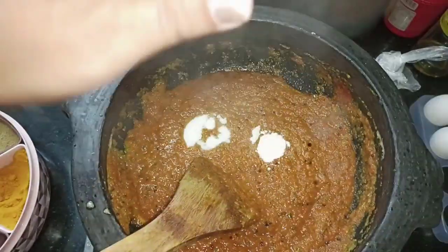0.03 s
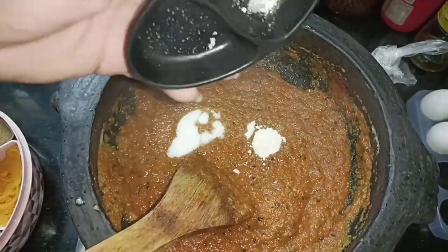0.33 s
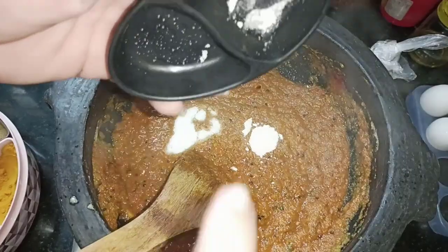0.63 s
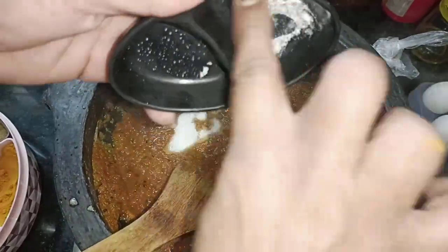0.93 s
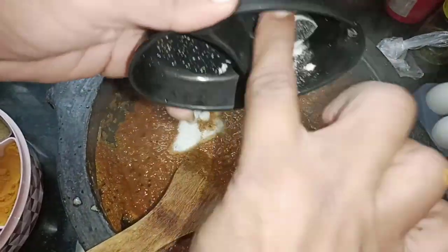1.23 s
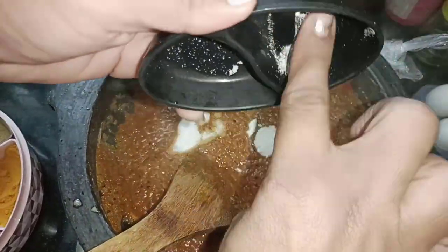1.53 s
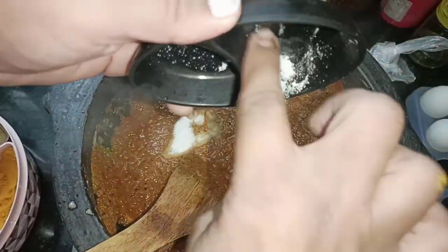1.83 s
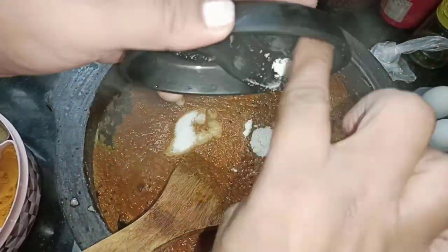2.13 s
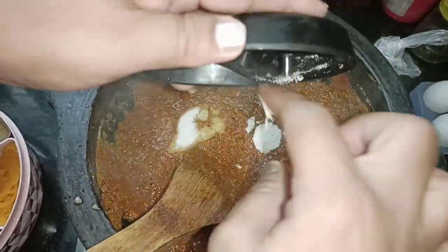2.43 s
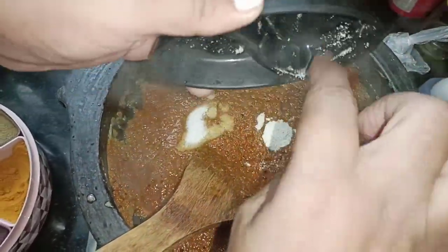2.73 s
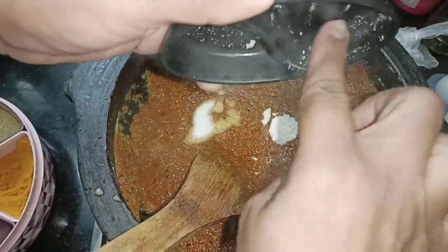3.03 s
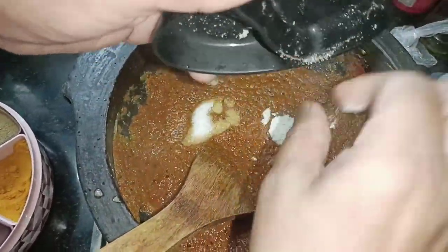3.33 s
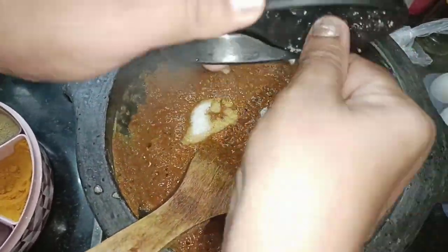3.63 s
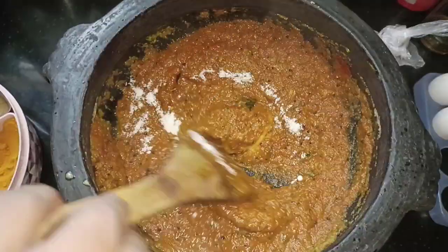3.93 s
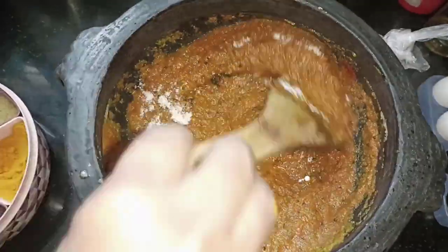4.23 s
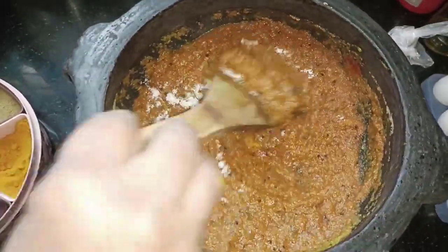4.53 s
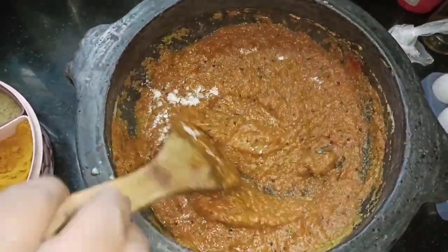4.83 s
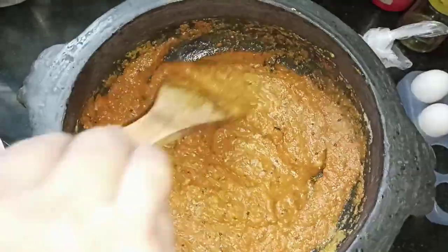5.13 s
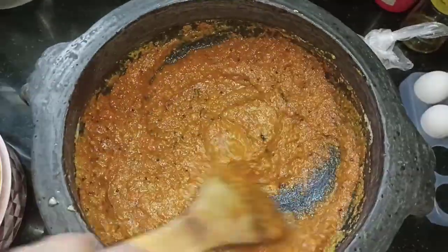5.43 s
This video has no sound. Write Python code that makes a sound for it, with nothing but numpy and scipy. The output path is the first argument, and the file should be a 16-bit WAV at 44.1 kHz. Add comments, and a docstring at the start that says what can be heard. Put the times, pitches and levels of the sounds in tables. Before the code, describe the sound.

Close to a clay pot in a small, quiet kitchen, thick masala simmers with little spits of steam and round bubble pops. A plastic dish clicks dryly above it a few times. Past halfway, a wooden spoon starts stirring in quick strokes, scraping and knocking dully on the clay while the wet paste squelches and sizzles louder. The sound drops out briefly near the end, then the stirring resumes.

```python
"""A small kitchen, close to a clay pot of thick masala frying. Steam jets hiss and whistle through
the paste, bursting bubbles ring as cavity resonators, and a plastic dish clicks above them.
Then a wooden spoon stirs in short strokes: stick-slip friction excites the modes of the clay,
each shove rocks the pot, and wet paste laid on the hot bottom flares into fresh sizzle.
Between two rounds of stirring the sound drops out briefly."""
import sys
import numpy as np
from scipy import signal
from scipy.fft import rfft, irfft, next_fast_len
from scipy.io import wavfile
from scipy.ndimage import uniform_filter1d, map_coordinates

SR = 44100
rng = np.random.default_rng(int(sys.argv[2]) if len(sys.argv) > 2 else 0)


def put_to_file(sound):
    """Save the sound as 16-bit audio at rate SR, in the file named by the first command-line argument."""
    columns = np.atleast_2d(sound).T  # one column per channel
    safe = np.clip(columns, -1, 1)
    whole_steps = np.round(safe * 32767)
    wavfile.write(sys.argv[1], SR, whole_steps.astype(np.int16))


N = 245637
TIME = np.arange(N) / SR


def amp(db):
    """Amplitude ratio of a level in decibels."""
    return 10 ** (np.asarray(db) / 20)


def unit(x):
    """Normalisation to rms 1."""
    return x / np.sqrt(np.mean(x ** 2) + 1e-20)


def along(points, hz):
    """Interpolation of (f/Hz, value) points on a logarithmic frequency axis."""
    f, v = np.transpose(points)
    return np.interp(np.log(hz + 1), np.log(f + 1), v)


def filtered(x, response):
    """Linear filtering: the spectrum times a complex frequency response."""
    n = x.shape[-1]
    m = next_fast_len(n + SR // 4)
    return irfft(rfft(x, m) * response(np.fft.rfftfreq(m, 1 / SR)), m)[..., :n]


def coloured(x, spectrum):
    """Minimum-phase filter through (f/Hz, gain/dB) points."""
    def response(hz):
        cepstrum = irfft(np.log(amp(along(spectrum, hz))))
        half = len(cepstrum) // 2
        return np.exp(rfft(np.r_[cepstrum[0], 2 * cepstrum[1:half], np.zeros(half)]))
    return filtered(x, response)


def resonance(f, hz, width):
    """Frequency response of a damped oscillator, unity at its centre."""
    return 1j * f * width / (hz * hz - f * f + 1j * f * width)


def cavity(x, hz, q):
    """Two equal resonators in cascade: one peak with steep skirts."""
    return filtered(x, lambda f: resonance(f, hz, hz / q) ** 2)


def ringing(x, modes):
    """Modal superposition: x drives resonators in parallel."""
    return filtered(x, lambda f: sum(amp(db) * resonance(f, hz, width) for hz, width, db in modes))


def wobble(rate):
    """Smooth random modulation, with rate knots a second."""
    return map_coordinates(rng.standard_normal(int(N * rate / SR) + 4), [TIME * rate])


def swell(s, rise, hold, fall, sag_db_per_s=31.5):
    """Exponential envelope: peak at s, sagging hold, release; rise and fall are the times for 20 dB."""
    t = TIME - s
    attack_db = np.minimum(20 * t / rise, 0)
    release_db = 20 * np.maximum(t - hold, 0) / fall
    return amp(attack_db - sag_db_per_s * np.clip(t, 0, hold) - release_db)


# Likeness of left and right: f/Hz, correlation coefficient
COHERENCE = [(100, 0.9), (600, 0.9), (1400, 0.04), (2500, 0.29)]
def pair(n):
    """Partially coherent stereo white noise: alike in the bass, nearly independent in the treble."""
    def weights(hz):
        angle = np.arccos(along(COHERENCE, hz)) / 2
        return np.array([np.cos(angle), np.sin(angle)])
    mid, side = filtered(rng.standard_normal((2, n)), weights)
    return np.array([mid + side, mid - side])


def crackle(rate, life_s, spread_db, share):
    """Shot noise: a share of the power arrives in random decaying bursts, rate a second."""
    onsets = rng.random(N) < rate / SR
    sizes = onsets * amp(spread_db * np.clip(rng.standard_normal(N), -2, 2)) ** 2
    power = signal.lfilter([1], [1, -np.exp(-2 / (life_s * SR))], sizes)
    return pair(N) * np.sqrt(1 - share + share * power / power.mean())


# Spectrum of the room air: f/Hz, level/dB
AIR_SPECTRUM = [(20, -37.5), (70, -4), (120, -14.5), (220, 1), (700, -10), (1500, -8.5), (2300, 6),
                (3200, -13.5), (4500, -24.5), (6700, -13.5), (8500, -7), (10000, -45.5), (16000, -23)]
# Soft low rumbles: t/s, hold/s, level/dB
RUMBLES = [(0.27, 0.033, -71), (0.6, 0.053, -71), (0.877, 0.13, -71), (2.73, 0.1, -77), (2.903, 0.22, -67),
           (3.25, 0.18, -71)]
def kitchen(air_db=-67, rumble_floor_db=-94):
    """Ambient noise: steady room air over a low rumble that comes and goes."""
    swells = sum(amp(db) * swell(s, rise=0.17, hold=hold, fall=hold) for s, hold, db in RUMBLES)
    spectrum = [(20, -19), (50, -10), (70, -2.5), (95, 6.5), (160, -16), (400, -104)]
    rumble = (amp(rumble_floor_db) + swells) * unit(coloured(pair(N), spectrum))
    return amp(air_db) * unit(coloured(pair(N), AIR_SPECTRUM)) + rumble


# Reverberation time of the kitchen: f/Hz, T60/s
REVERB_TIMES = [(150, 0.2), (1000, 0.19), (5000, 0.16), (15000, 0.27)]
def walls(x, delay_s=0.0014):
    """Reverberation: a diffuse tail decays exponentially, at its own rate for each frequency."""
    hz, t, z = signal.stft(pair(SR // 2), SR, nperseg=256)
    tail = signal.istft(z * amp(-60 * t / along(REVERB_TIMES, hz)[:, None]), SR, nperseg=256)[1]
    tail *= np.clip(np.arange(tail.shape[1]) / SR / delay_s - 1, 0, 1)
    echo = signal.fftconvolve(x, tail / np.linalg.norm(tail[0]), axes=1)[:, :N]
    return coloured(echo, [(200, -13.5), (600, -6.5), (1300, -2.5), (6000, -9), (14000, -7)])


# Soft pushes on the pot: t/s, level/dB, f/Hz, rise/s
BUMPS = [(0.268, -49, 110, 0.013), (.608, -58, 114.5, 0.023), (2.607, -61, 117, 0.018),
         (3.745, -56, 62, 0.012), (4.019, -48, 118, 0.021), (4.131, -43, 121, 0.021),
         (4.372, -56, 58, 0.0073), (4.513, -48, 111, 0.018), (4.56, -57, 55, 0.014),
         (4.606, -37.5, 118.5, 0.017), (4.729, -55, 113, 0.011), (4.929, -54, 60, .009),
         (5.281, -47.5, 115, 0.021), (5.425, -59, 68, .016)]
def bumps(jitter_rad=0.17, rumble_db=-5):
    """Damped oscillation: a push sets the pot rocking unevenly, with a loose rumble from its stand."""
    out, t = np.zeros((2, N)), np.arange(SR // 3) / SR
    for s, db, hz, rise in BUMPS:
        rock = np.sin(2 * np.pi * hz * t + jitter_rad * wobble(70)[:len(t)])
        rumble = amp(rumble_db) * unit(cavity(pair(len(t)), hz, q=0.75))
        add(out, s, amp(db) * t / rise * np.exp(1 - t / rise) * (rock + rumble))
    return out


def add(track, s, sound):
    """Superposition of a sound on the track, from s seconds."""
    part = track[..., max(round(s * SR), 0):][..., :sound.shape[-1]]
    part += sound[..., :part.shape[-1]]


# Peaks and dips of the hollow above the paste: f/Hz, bandwidth/Hz, gain/dB
BOWL_MODES = [(1744, 94, 12), (2130, 60, 2.5), (2640, 660, 4.5), (3410, 130, -12), (5000, 450, 7.5),
              (6540, 44, -0.5), (6850, 260, 4)]
def bowl(x):
    """Cavity resonance: the air in the pot colours the sizzle."""
    return filtered(x, lambda f: 1 + sum((amp(db) - 1) * resonance(f, hz, width)
                                         for hz, width, db in BOWL_MODES))


def folds(x, depth_db):
    """Spectral modulation: band gains drift at random, as when folds of paste open and close."""
    z = signal.stft(x, nperseg=512)[2]
    field = uniform_filter1d(rng.standard_normal(z.shape[1:]), size=3, axis=0)
    field = uniform_filter1d(field, size=8, axis=1)
    return signal.istft(z * amp(depth_db * unit(field)), nperseg=512)[1][:, :N]


# Spectrum of hissing steam and oil: f/Hz, level/dB
HISS_SPECTRUM = [(1100, -63), (1550, -45.5), (1850, -4), (2100, -4), (2450, -3), (3100, -8), (3700, -7),
                 (4500, -19.5), (5400, -12), (6700, -5), (7700, -13), (8800, -21), (11000, -50)]
def simmer(level_db=-70.5):
    """Shot noise of tiny bubbles ticking in the oil throughout."""
    ticks = bowl(crackle(rate=45, life_s=0.005, spread_db=3, share=0.75))
    return amp(level_db) * unit(coloured(ticks, HISS_SPECTRUM))


def faint_spits(count=12, until_s=3.5, width_s=0.0064, hz=2000, whistle_db=-6, spray_db=-12):
    """A random point process: weak spits, as rows like those of SPITS."""
    return [(until_s * when, width_s, -53 - 6 * weakness, hz * 2 ** (pitch - 0.5), whistle_db, spray_db)
            for when, weakness, pitch in rng.random((count, 3))]


# Spectra of a crater's throat and of fine spray: f/Hz, level/dB
THROAT_SPECTRUM = [(200, -19.5), (420, -16.5), (570, -3), (720, -10.5), (860, -4), (1000, -27), (1220, 9),
                   (1400, -10), (1600, -22.5), (2200, -75.5)]
FIZZ_SPECTRUM = [(7000, -14.5), (8500, -48), (9800, -1), (11200, -3), (12200, 9.5), (14000, 6),
                 (16000, 3.5)]
# Strong spits of steam: t/s, half-length/s, level/dB, whistle f/Hz, whistle and spray/dB re level
SPITS = [(0.071, 0.032, -56, 3000, -0.5, -15.5), (0.094, 0.0031, -53, 5680, 9.5, 4),
         (0.142, 0.0054, -56.5, 2200, 8, -18), (0.156, 0.0043, -41.5, 1250, -11, -20.5),
         (0.243, 0.0088, -51, 1880, -4, -11.5), (.284, 0.01, -53, 596, -16, -35),
         (0.419, 0.005, -45, 6870, -3, -3.5), (0.445, 0.0054, -54.5, 2830, 8.5, -12),
         (0.604, 0.0054, -39, 2405, 2, -24.5), (0.716, 0.02, -53.5, 5330, -9, -5),
         (0.865, 0.0071, -54, 1780, 5.5, -10), (0.893, 0.0024, -52.5, 5900, 6.5, -3.5),
         (0.966, 0.0073, -49.5, 1190, -13, -13.5), (1.003, 0.013, -52, 1260, -8, -4),
         (1.154, 0.013, -50.5, 2510, 1, -10), (1.242, 0.0052, -41, 5950, -1.5, 3),
         (1.343, 0.014, -49.5, 1850, -6, -5.5), (1.508, 0.047, -59, 5250, -10, -7.5),
         (1.649, 0.023, -46, 2570, -13, -13.5), (1.706, 0.003, -37, 1770, -6, -15.5),
         (1.746, 0.0089, -41.5, 6040, -4.5, -1), (1.886, 0.0024, -43, 6550, 1, -19.5),
         (1.975, 0.022, -60.5, 6660, 7.5, 5.5), (2.029, 0.0052, -44, 5440, -7, -16),
         (2.134, 0.0063, -43, 3680, -2.5, -22.5), (2.19, 0.019, -49.5, 2050, -4, -10),
         (2.26, 0.0059, -44, 2900, -4, -17), (2.349, 0.0051, -46, 2600, 7.5, 4.5),
         (2.365, 0.0045, -42.5, 5300, -18, 1.5), (2.597, 0.0053, -39.5, 2620, -10.5, -18.5),
         (2.792, 0.011, -50.5, 2660, -8.5, -9.5), (2.86, .011, -47.5, 2670, -10, -8),
         (3.024, 0.0094, -47.5, 2270, -4, -16.5), (3.067, 0.012, -44, 2640, -0.5, -4.5),
         (3.175, 0.0041, -46.5, 2050, 0, -15), (3.194, 0.0033, -49.5, 2170, 7, -16),
         (3.209, 0.0089, -51, 2250, -5, -5), (3.252, 0.011, -42, 2490, -4.5, -12.5),
         (3.393, 0.0067, -41, 2580, 5.5, -1.5), (3.475, 0.0096, -51, 1900, 4, -30)]
def spits(whistle_q=10, crater_hz=1330):
    """Jet noise: steam escapes a crater in the paste, rings its throat, whistles and throws off spray."""
    powers, whistles = np.zeros((3, N)), np.zeros((2, N))
    for s, width, db, hz, whistle_db, spray_db in SPITS + faint_spits():
        skew = np.where(TIME < s, 0.8, 1.15)  # opens faster than it closes
        opening = np.exp(-0.25 * ((TIME - s) / (width * skew)) ** 2)
        throat_db = -4.5 - 3 * np.log2(hz / crater_hz)  # narrower craters: higher, with less throat
        powers += (amp([[db], [db + throat_db], [db + spray_db]]) * opening) ** 2
        start = max(s - 0.06, 0)
        envelope = opening[round(start * SR):][:SR // 8]
        whistle = unit(cavity(pair(len(envelope)), hz, whistle_q))
        add(whistles, start, amp(db + whistle_db) * envelope * whistle)
    steam = folds(bowl(crackle(rate=330, life_s=0.0009, spread_db=3, share=0.55)), depth_db=3.5)
    bands = zip(powers, (HISS_SPECTRUM, THROAT_SPECTRUM, FIZZ_SPECTRUM))
    return whistles + sum(np.sqrt(power) * unit(coloured(steam, spectrum)) for power, spectrum in bands)


def pop(hz, t60, crack_db, scatter_db, attack_cycles, crack_t60=0.017, scatter_t60=0.024):
    """Impulse response: a broadband crack and a damped ring, scattered by the wall of the pot."""
    t = np.arange(SR // 8) / SR
    ring = np.sin(2 * np.pi * hz * t) * amp(-60 * t / t60)
    crack_spectrum = [(300, -38.5), (2500, -23), (4500, 0.5), (6300, 9), (9500, -13.5), (14000, -3.5)]
    crack = unit(coloured(pair(len(t)), crack_spectrum)) / 2
    scatter = unit(cavity(pair(len(t)), hz, q=1)) * amp(scatter_db - 60 * t / scatter_t60)
    attack = 1 - np.exp(-(t * hz / attack_cycles) ** 2)
    passband = [(0.14 * hz, -20), (0.45 * hz, 0), (1.56 * hz, 0), (1.56 * hz, -16)]
    body = coloured(attack * (ring + scatter), passband)
    return body + amp(crack_db - 60 * t / crack_t60) * crack


# Bursting bubbles: t/s, level/dB, f/Hz, T60/s, splash/dB re level
BUBBLES = [(.154, -40.5, 690, 0.03, -24), (.4688, -21.5, 840, 0.019, -14.5),
           (0.785, -38.5, 880, 0.0046, 0.5), (1.091, -15, 950, 0.0092, -15.5),
           (1.335, -33, 1885, 0.038, -12), (1.34, -44, 595, 0.052, -4.5), (1.487, -47, 763, 0.049, 4.5),
           (1.959, -29.5, 1227, 0.031, -11), (2.113, -36, 1900, 0.047, -1.5),
           (2.176, -27.5, 1170, 0.024, -20), (2.1771, -11.5, 1970, 0.0087, -19),
           (2.257, -41.5, 523, 0.028, -16), (2.35, -20.5, 2460, 0.014, -8.5), (2.363, -31, 580, 0.027, -9),
           (2.441, -45.5, 1280, 0.042, -7), (3.081, -29, 612, 0.025, -7), (3.192, -32, 1236, 0.036, -10),
           (3.219, -35, 820, .018, -16), (3.2455, -25.5, 1920, 0.012, 1.5), (3.461, -40, 620, 0.029, -1),
           (3.484, -43, 520, 0.05, -4), (3.664, -16.5, 1180, 0.016, -18), (3.6758, -16, 2330, 0.01, -20)]
def bubbles():
    """Cavity resonance: each bursting bubble rings with a round tone and hardly a crack."""
    out = np.zeros((2, N))
    for s, db, hz, t60, splash_db in BUBBLES:
        add(out, s, amp(db) * pop(hz, t60, crack_db=-28, scatter_db=splash_db, attack_cycles=2.44))
    return out


# Hard, dry clicks: t/s, level/dB, f/Hz, crack gain/dB
CLICKS = [(0.407, -32.5, 1350, -10.5), (0.4195, -36.5, 5000, -2), (.6015, -23.5, 2650, 1.5),
          (0.6094, -13.5, 3340, -5), (1.6418, 1, 3630, -29.5), (2.1298, -23.5, 3560, -8),
          (2.364, -24, 2490, -4), (2.6085, -23, 2370, 4.5), (3.0825, -11.5, 2410, -12.5),
          (3.2599, -28.5, 5270, -3.5), (3.4125, -24.5, 2670, -6), (3.6935, -2, 2760, -9),
          (3.7378, -13, 2300, -9.5), (4.382, -9, 2260, -0.5)]
def dish_clicks():
    """Impact on a heavily damped body: the plastic dish cracks and stops at once."""
    out = np.zeros((2, N))
    for s, db, hz, crack_db in CLICKS:
        add(out, s, amp(db) * pop(hz, t60=0.0019, crack_db=crack_db, scatter_db=-15, attack_cycles=0.41))
    return out


def squelch(rate, hz, octaves, cycles, spread_db):
    """Free decay of air pockets torn open in the wet paste, rate a second, each of its own pitch."""
    chance = rng.standard_normal((int(rate * N / SR), 2))
    t = np.arange(SR // 60) / SR
    pitch = hz * 2 ** (octaves * np.clip(chance[:, :1], -1.5, 2))
    size = amp(spread_db * np.clip(chance[:, 1:], -2, 2))
    rings = size * np.sin(2 * np.pi * pitch * t) * np.exp(-2 * pitch * t / cycles)
    where = rng.integers(0, N - len(t), (len(chance), 1)) + np.arange(len(t))
    return np.bincount(where.ravel(), rings.ravel(), N)


# Spectrum of stirred paste frying: f/Hz, level/dB
SIZZLE_SPECTRUM = [(700, -34.5), (1250, -14.5), (1550, -25.5), (2000, -11.5), (2450, -6), (3100, -12.5),
                   (3800, -9), (4500, -20.5), (5500, -2.5), (6800, -7), (7800, -17.5), (8800, -31),
                   (11000, -64)]
# Fresh paste meeting hot clay: t/s, hold/s, level/dB, fizz/dB re level
FLARES = [(3.763, 0.042, -38.5, -17), (4.017, 0.072, -32, -14.5), (4.214, 0.13, -47.5, -10),
          (4.411, 0.12, -31, -10.5), (4.668, 0.036, -32.5, -13), (4.918, 0.011, -34, -13),
          (5.074, 0.16, -39, -12), (5.327, 0.13, -39.5, -15), (5.502, 0.028, -36, -28.5)]
def stirred_sizzle(start_s=3.657, sizzle_db=-42.5, fizz_db=-59.5, flutter_db=2.5):
    """Rapid boiling: wet paste on the hot bottom flares up, with air pockets and a sticky crackle."""
    stirred = np.clip((TIME - start_s) / 0.0016 + 1, 0, 1)
    sizzle_power, fizz_power = (stirred * amp([[sizzle_db], [fizz_db]])) ** 2
    for s, hold, db, flare_fizz_db in FLARES:
        flare = amp(db) * swell(s, rise=0.056, hold=hold, fall=0.029)
        sizzle_power += flare ** 2
        fizz_power += (amp(flare_fizz_db) * flare) ** 2
    frying = folds(bowl(crackle(rate=800, life_s=0.0007, spread_db=3.5, share=0.38)), depth_db=4.8)
    pockets = np.array([squelch(550, 2400, octaves=0.739, cycles=9, spread_db=-1.5) for _ in range(2)])
    sticky = np.array([squelch(130, 2745, octaves=0.342, cycles=23, spread_db=2) for _ in range(2)])
    squelches = amp(-3) * unit(coloured(pockets, SIZZLE_SPECTRUM)) + amp(-5) * unit(sticky)
    sizzle = np.sqrt(sizzle_power) * unit(unit(coloured(frying, SIZZLE_SPECTRUM)) + squelches)
    fizz = np.sqrt(fizz_power) * unit(coloured(frying, FIZZ_SPECTRUM))
    return amp(flutter_db * wobble(40)) * (sizzle + fizz)


# Higher modes of the clay wall: f/Hz, bandwidth/Hz, gain/dB
RIM_MODES = [(847, 20, -2.5), (959, 9.7, 12), (1095, 15, 0.5), (1106, 27, -4), (1390, 25, -10),
             (1910, 20, -9), (2220, 76, 7.5), (2395, 44, -1.5), (2520, 150, 9.5), (2710, 110, 0.5),
             (3320, 30, -10.5), (3230, 43, 1.5)]
# Paste leaving the blade: t/s, level/dB, centre f/Hz, T60/s
SMACKS = [(3.947, -37.5, 1900, 0.22), (4.004, -33.5, 2420, .05), (4.058, -24, 1270, 0.042),
          (4.12, -30.5, 1740, 0.04), (4.264, -26, 2396, 0.03), (4.38, -20, 3600, 0.062),
          (4.414, -29, 3000, 0.076), (4.448, -26, 2550, 0.079), (4.499, -27, 2700, 0.035),
          (4.536, -27.5, 1400, 0.094), (4.597, -26.5, 2500, 0.067), (4.677, -38, 3280, 0.073),
          (4.849, -31, 1230, 0.058), (4.857, -31.5, 2400, 0.14), (5.196, -22, 1630, 0.072),
          (5.197, -21.5, 2460, 0.04), (5.261, -24, 2400, 0.065), (5.497, -31, 2380, 0.073),
          (5.518, -28.5, 2480, 0.067)]
def smacks(rise_s=0.0019, ring_db=-5):
    """Transient excitation: paste tears off the blade in tiny bursts that set the clay wall ringing."""
    out, t = np.zeros((2, N)), np.arange(SR // 6) / SR
    tearing = folds(crackle(rate=900, life_s=0.0015, spread_db=2.5, share=0.6), depth_db=4.5)
    for s, db, hz, t60 in SMACKS:
        burst = cavity(tearing[:, rng.integers(N - len(t)):][:, :len(t)], hz, q=0.74)
        wet = unit(coloured(burst, [(1.39 * hz, 0), (2.78 * hz, -20)]))
        add(out, s, amp(db - 60 * t / t60) * (1 - np.exp(-t / rise_s)) * wet)
    return out + amp(ring_db) * ringing(out, RIM_MODES)


# Joint modes of the paste-damped pot and the spoon: f/Hz, bandwidth/Hz, gain/dB
POT_MODES = [(437.4, 9.5, 6), (451, 164, 1.5), (559.3, 57, 6.5), (636, 72, 0), (699, 43, -11.5),
             (834, 120, -1.5), (1090, 130, -18)]
# The spoon catching on the clay: t/s, level/dB, f/Hz, clack/dB re level
KNOCKS = [(3.758, -32.5, 504, -12), (3.784, -28.5, 536, -24), (3.797, -29, 526, -26),
          (3.832, -28.5, 436, -14), (4.005, -23.5, 479, -13), (4.033, -34, 540, -14),
          (4.118, -25, 490, -2.5), (4.258, -27, 645, -28), (4.271, -29.5, 597, -32), (4.453, -34, 577, -16),
          (4.495, -23.5, 423, -10), (4.529, -22.5, 425, -12), (4.5948, -26, 454, 1.5),
          (4.602, -28, 533, -12), (4.698, -32.5, 520, -20), (4.733, -28.5, 556, -29),
          (4.778, -28.5, 440, -7.5), (4.929, -31.5, 473, -10.5), (5.103, -25.5, 590, -18),
          (5.133, -27.5, 570, -17), (5.26, -29.5, 508, 1), (5.353, -26.5, 575, -37), (5.369, -30, 567, -35),
          (5.408, -27.5, 620, -32), (5.483, -30, 558, -20)]
def knocks(grit_db=-12, grit_t60=0.14, clack_hz=1020, clack_t60=0.081, cushion_s=0.0013, push_db=-4):
    """Impact excitation: a blunt push rings the pot; hard contacts also clack the wood and crush grit."""
    out, t = np.zeros((2, N)), np.arange(SR // 8) / SR
    impulse = signal.unit_impulse(len(t))
    for s, db, hz, clack_db in KNOCKS:
        ring = cavity(ringing(impulse, POT_MODES), hz, q=2.86)
        push = cavity(impulse, hz, q=1.07)
        body = ring / np.abs(ring).max() + amp(push_db) * push / np.abs(push).max()
        grit = amp(grit_db - 60 * t / grit_t60) * unit(coloured(pair(len(t)), SIZZLE_SPECTRUM))
        clack = amp(-60 * t / clack_t60) * unit(cavity(pair(len(t)), clack_hz, q=0.9))
        cushion = 1 - np.exp(-t / cushion_s)  # the paste softens the contact
        add(out, s, amp(db) * (body + amp(clack_db) * cushion * (grit + clack)))
    return out


# Strokes of the blade, for rocking, rim and scraping:
# t/s at full push, rise/s, hold/s, scrape level/dB, f/Hz, focus depth/dB, thud level/dB, rim/dB re scrape
STROKES = [(3.76, 0.035, 0.081, -34.5, 460, 9, -46, -14), (4.009, 0.041, 0.13, -34, 457, 5.5, -55, -11),
           (4.263, 0.078, 0.055, -33, 578, 8.5, -50, -10.5),
           (4.476, 0.089, 0.062, -31.5, 460, 7, -68, -13.5), (4.591, 0.022, 0.02, -32, 564, 8, -44, -5.5),
           (4.708, 0.04, 0.07, -36, 446, 8.5, -53, -9.5), (4.882, 0.093, 0.038, -40, 510, 12.5, -68, 0),
           (5.094, 0.088, 0.11, -37.5, 497, 27.5, -89, -5.5),
           (5.261, 0.011, 0.01, -39.5, 550, 19, -74, 1.5), (5.35, 0.016, 0.03, -32.5, 574, 43.5, -70, -22),
           (5.412, 0.033, 0.042, -34.5, 622, 38, -60, -7.5), (5.481, 0.023, 0.019, -41, 537, 29, -73, -4.5)]
def rocking(lag_s=0.0098, settle_s=0.16):
    """Forced vibration: just after each shove the heavy pot thuds dully on its stand."""
    shove = sum(amp(thud_db) * swell(s + lag_s, rise, hold, settle_s)
                for s, rise, hold, *_, thud_db, rim_db in STROKES)
    return shove * thud()


# Spectrum of the pot on its stand: f/Hz, level/dB
THUD_SPECTRUM = [(20, -44), (50, -34), (72, -17), (92, -29), (116, 4), (145, -18.5), (200, -3), (320, -0.5),
                 (600, -69)]
def thud():
    """Low resonance of the pot on its stand, driven by noise."""
    return unit(coloured(pair(N), THUD_SPECTRUM))


def rim(release_s=0.13):
    """Friction drives the modes of the clay wall, which swell and fade as the contact travels."""
    pushes = [amp(db + rim_db) * swell(s, rise, hold, release_s)
              for s, rise, hold, db, *_, rim_db in STROKES]
    friction = crackle(rate=340, life_s=0.0052, spread_db=4, share=0.78)
    singing = unit(folds(ringing(friction, RIM_MODES), depth_db=7))
    return np.linalg.norm(pushes, axis=0) * singing


def scraping(release_s=0.086, focus_octaves=0.53, wander_octaves=0.048):
    """Stick-slip friction: the blade chatters on the clay; the place of contact favours some modes."""
    pushes = np.array([amp(db) * swell(s, rise, hold, release_s) for s, rise, hold, db, *_ in STROKES])
    tones = np.array([(hz, depth_db) for *_, hz, depth_db, thud_db, rim_db in STROKES])
    pitch, depth_db = tones[pushes.argmax(axis=0)].T  # the strongest push sets the tone
    pitch = pitch * 2 ** (wander_octaves * wobble(25))
    friction = crackle(rate=100, life_s=0.021, spread_db=4.5, share=0.33)
    hz, frames, z = signal.stft(ringing(friction, POT_MODES), SR, nperseg=1024)
    octaves = np.log2((hz[:, None] + 1) / np.interp(frames, TIME, pitch))
    bell = np.exp(-0.5 * (octaves / focus_octaves) ** 2)
    focus = amp(np.interp(frames, TIME, depth_db) * (bell - 2))
    slips = signal.istft(z * focus, SR, nperseg=1024)[1][:, :N]
    # the hand's push sets the strength of a stroke, the slips only its grain
    power = uniform_filter1d(np.mean(slips ** 2, axis=0), size=SR // 16)
    grain = slips / np.sqrt(np.abs(power) + 1e-20)
    return np.linalg.norm(pushes, axis=0) * grain


# Response of the right channel: f/Hz, gain/dB re left
RIGHT_RESPONSE = [(100, -1.5), (550, 0.5), (1100, 0.5), (1800, -7.5), (2400, -19.5), (3500, -9.5),
                  (6500, -14.5), (9000, 1), (13000, -8)]
def scene(left_lag_s=0.00014):
    """Superposition of direct sound, echo and room air; the left side is brighter and slightly later."""
    direct = simmer() + spits() + bubbles() + dish_clicks()
    direct += stirred_sizzle() + smacks() + scraping() + rim() + rocking() + knocks() + bumps()
    left, right = direct + walls(direct) + kitchen()
    left = filtered(left, lambda hz: np.exp(-2j * np.pi * hz * left_lag_s))
    return np.array([left, coloured(right, RIGHT_RESPONSE)])


def record(dry, drop_s=4.942, back_s=5.095, cut_db_per_s=2307, return_db_per_s=370, top_hz=15800):
    """Gain, noise floor and band limit: the sound cuts out briefly and fades back in over faint hiss."""
    dropout_db = np.maximum((drop_s - TIME) * cut_db_per_s, (TIME - back_s) * return_db_per_s)
    gain = amp(np.minimum(dropout_db, 0))
    hiss = amp(-87) * unit(coloured(pair(N), AIR_SPECTRUM))
    return filtered(dry * gain + hiss, lambda hz: hz < top_hz)


dry = scene()
out = record(dry)
put_to_file(out)
```